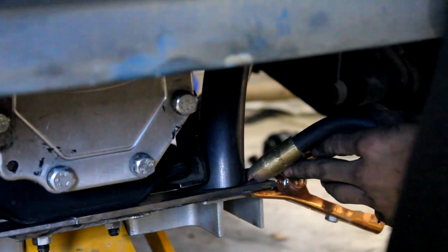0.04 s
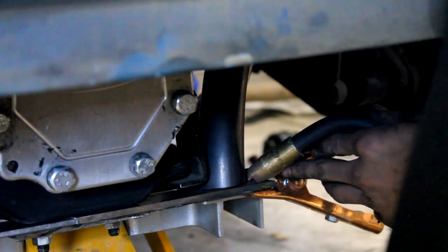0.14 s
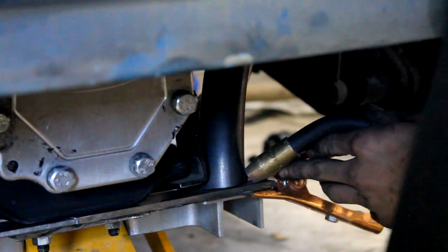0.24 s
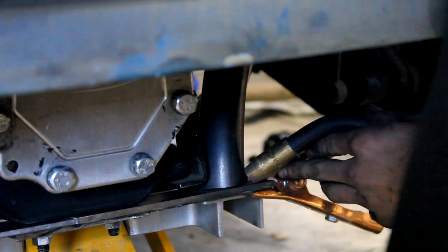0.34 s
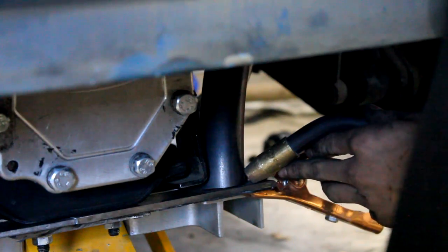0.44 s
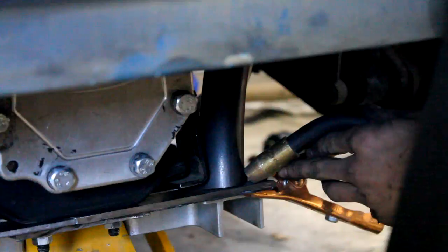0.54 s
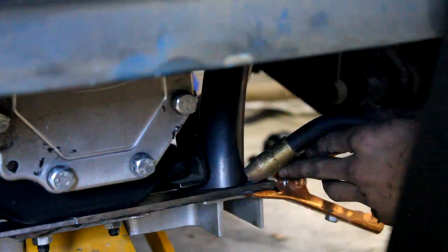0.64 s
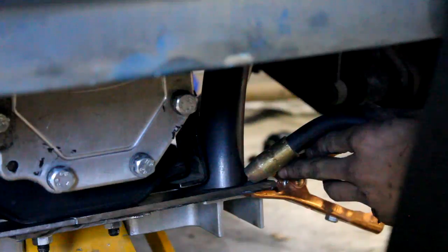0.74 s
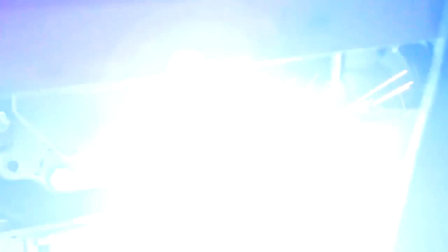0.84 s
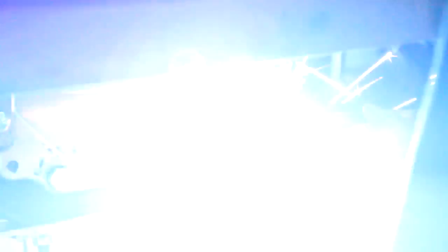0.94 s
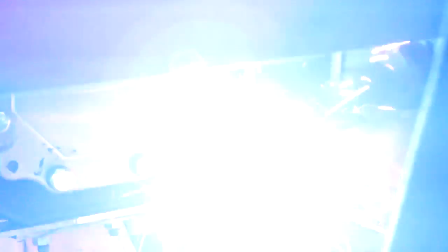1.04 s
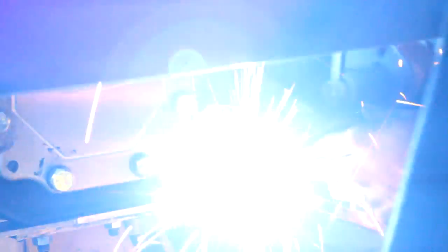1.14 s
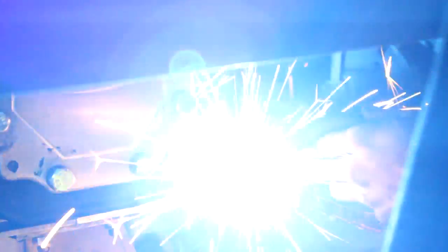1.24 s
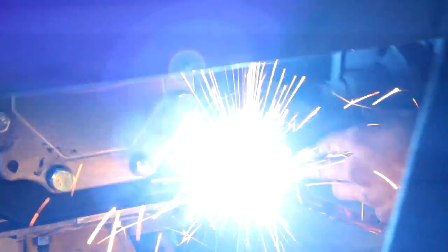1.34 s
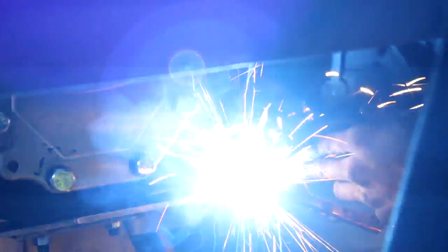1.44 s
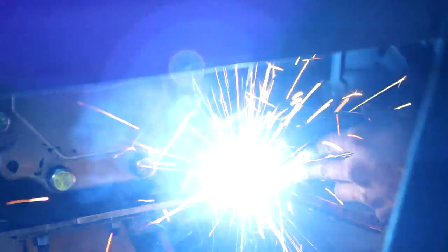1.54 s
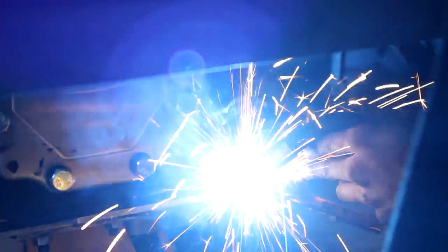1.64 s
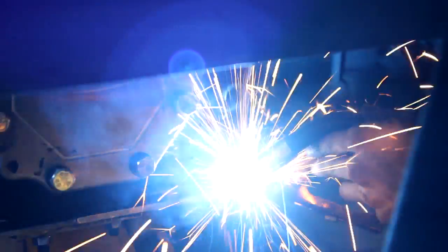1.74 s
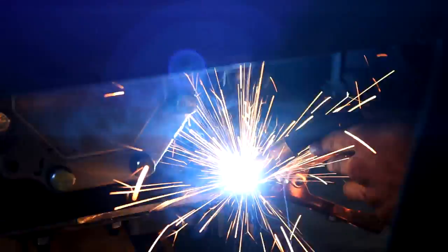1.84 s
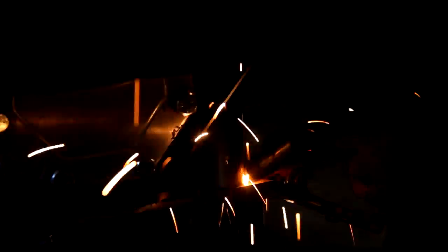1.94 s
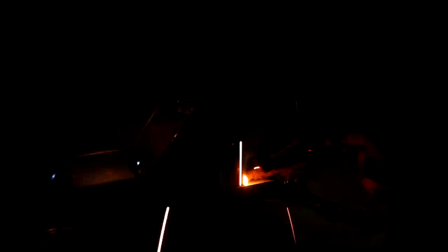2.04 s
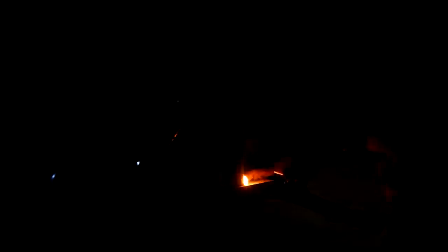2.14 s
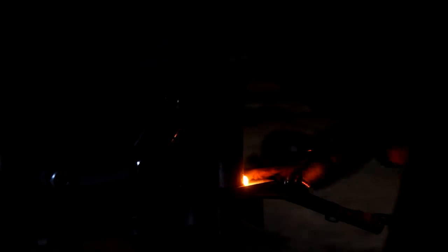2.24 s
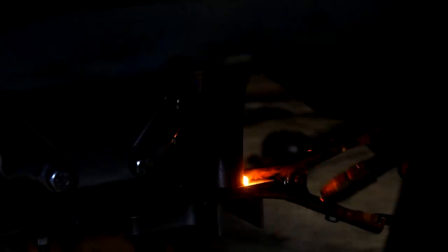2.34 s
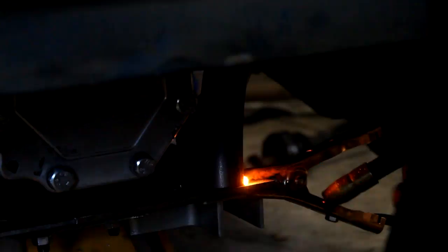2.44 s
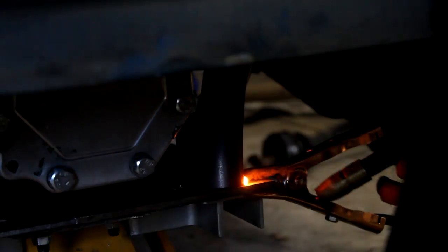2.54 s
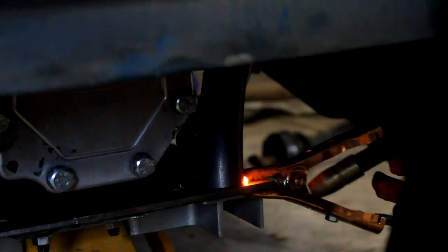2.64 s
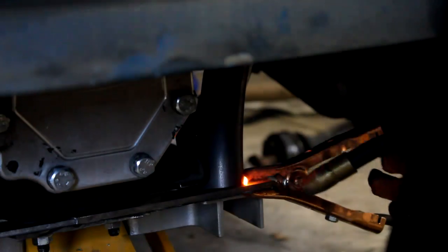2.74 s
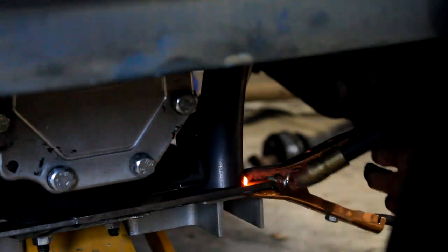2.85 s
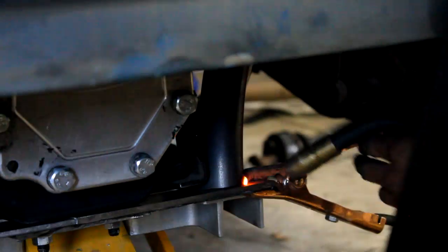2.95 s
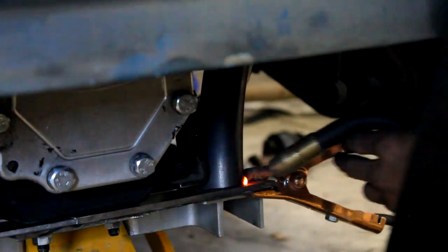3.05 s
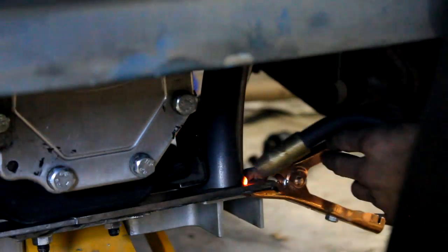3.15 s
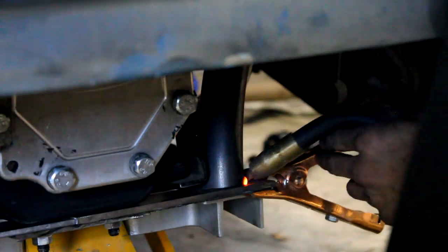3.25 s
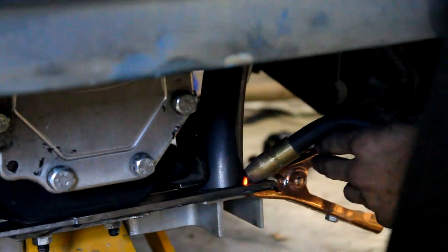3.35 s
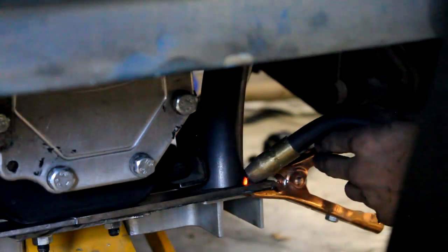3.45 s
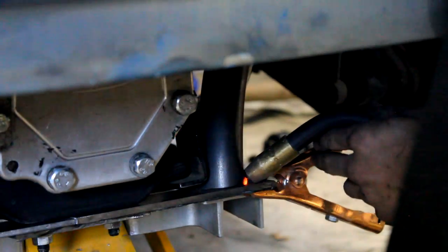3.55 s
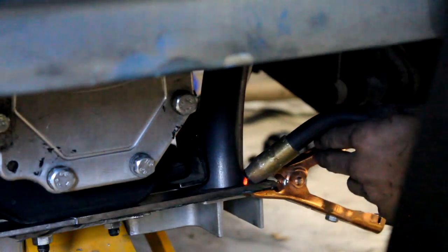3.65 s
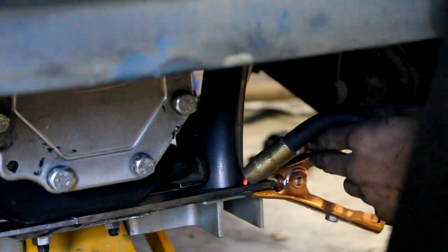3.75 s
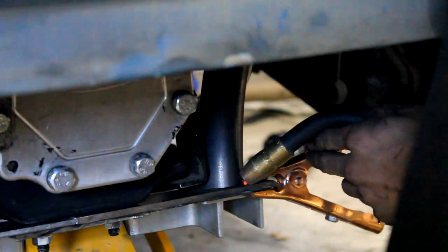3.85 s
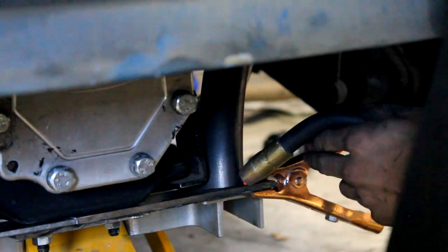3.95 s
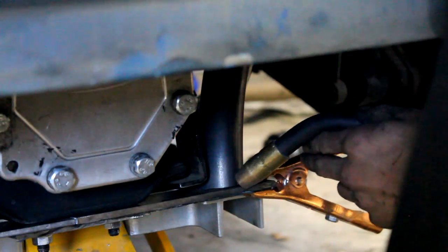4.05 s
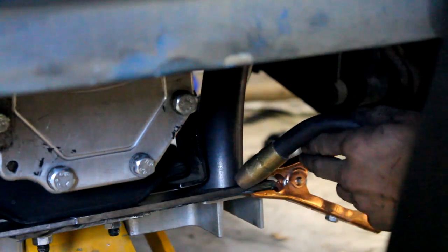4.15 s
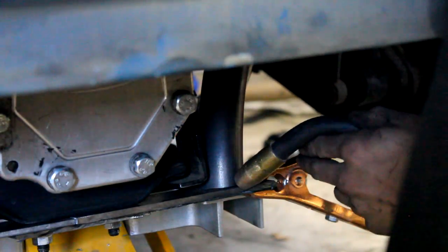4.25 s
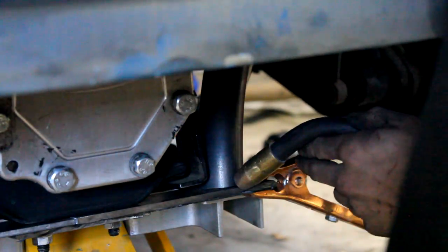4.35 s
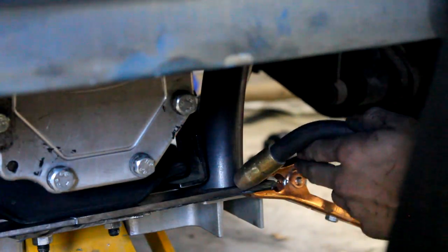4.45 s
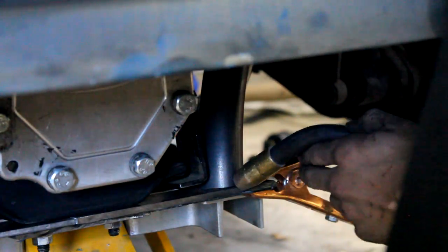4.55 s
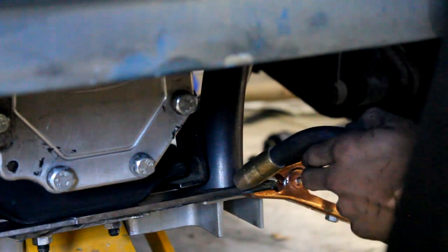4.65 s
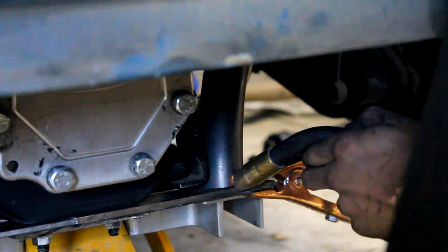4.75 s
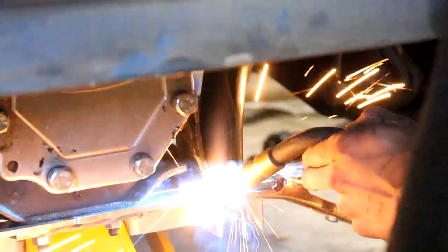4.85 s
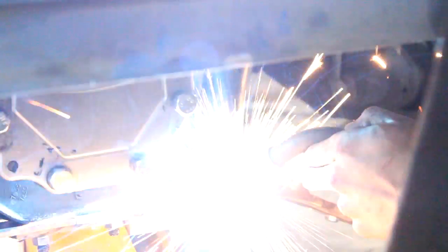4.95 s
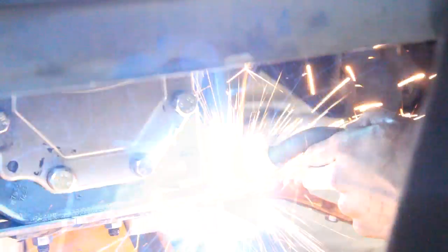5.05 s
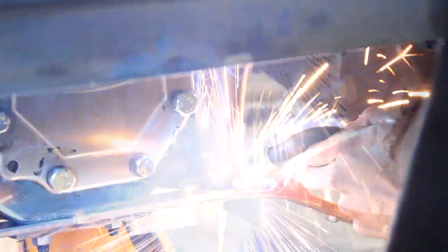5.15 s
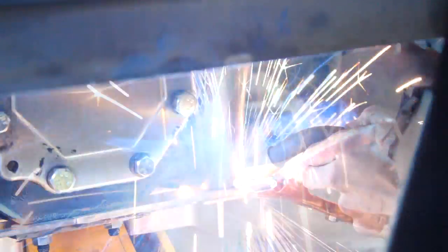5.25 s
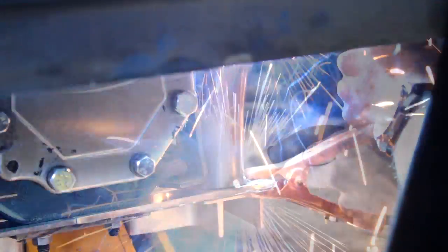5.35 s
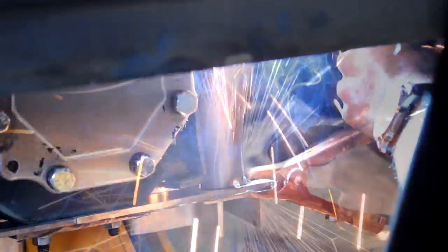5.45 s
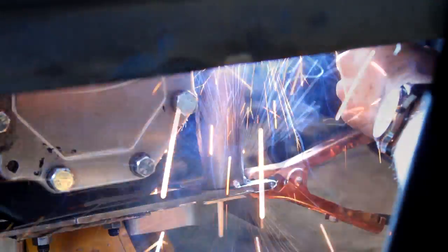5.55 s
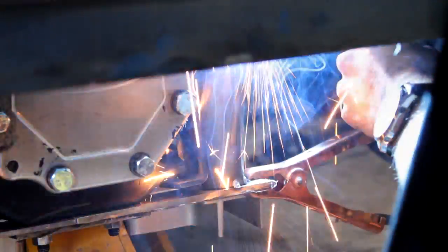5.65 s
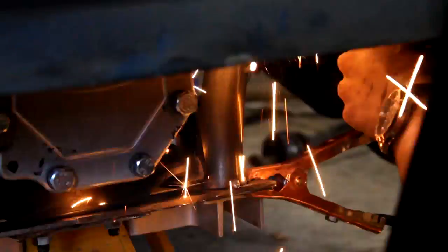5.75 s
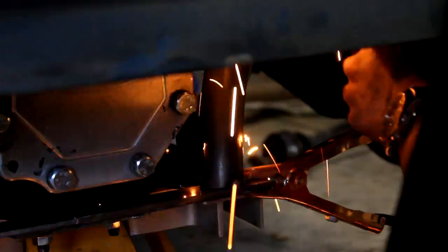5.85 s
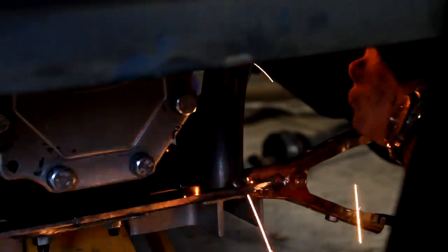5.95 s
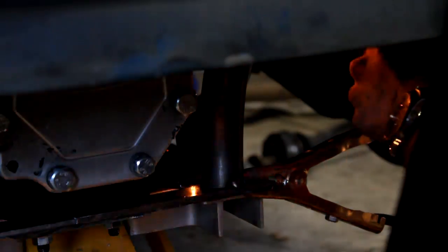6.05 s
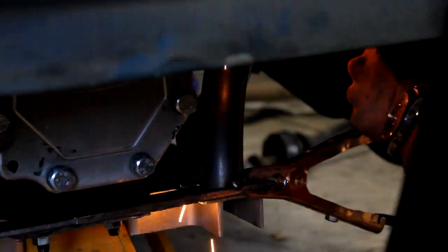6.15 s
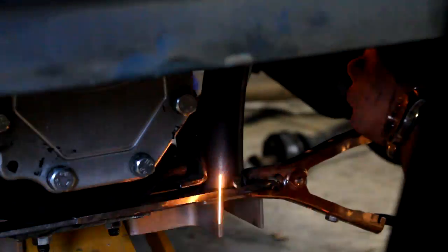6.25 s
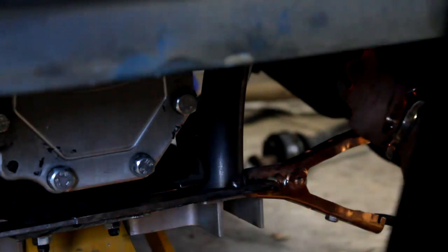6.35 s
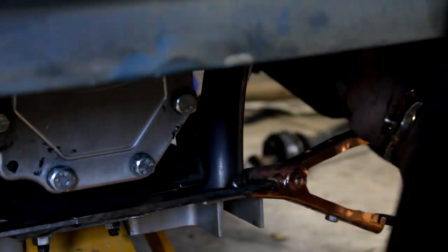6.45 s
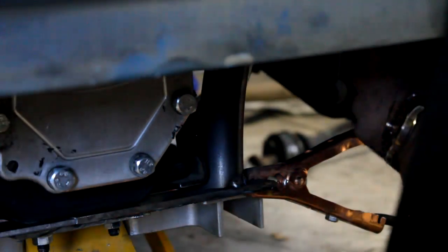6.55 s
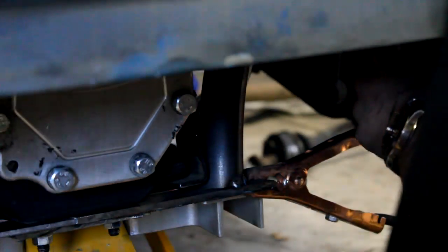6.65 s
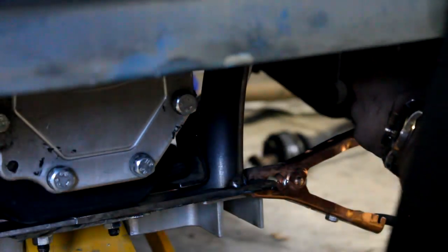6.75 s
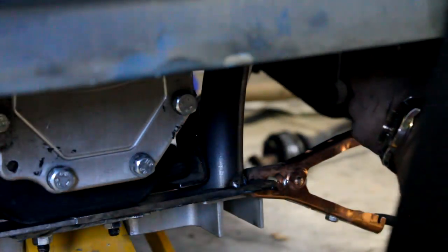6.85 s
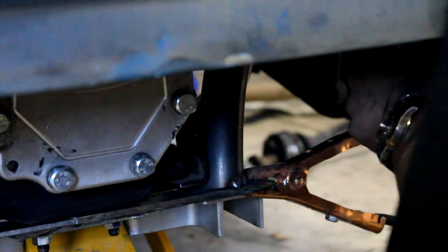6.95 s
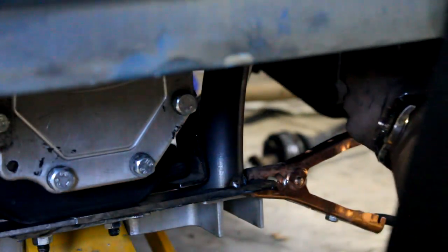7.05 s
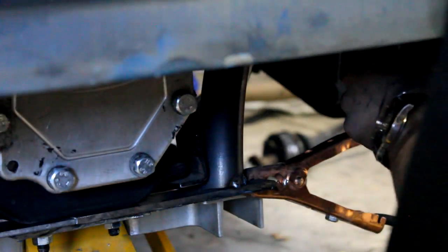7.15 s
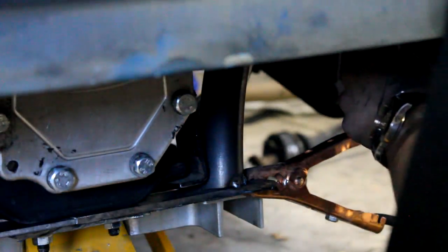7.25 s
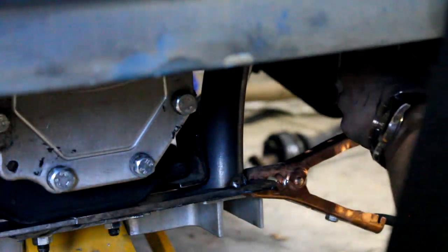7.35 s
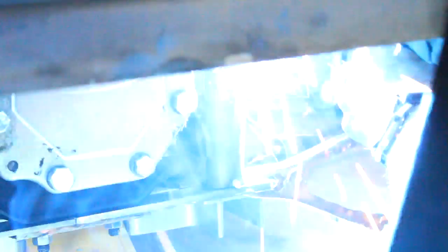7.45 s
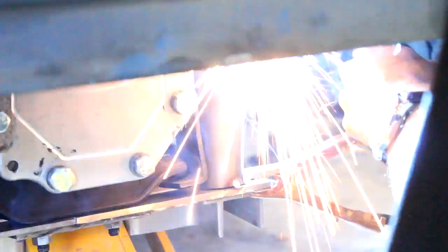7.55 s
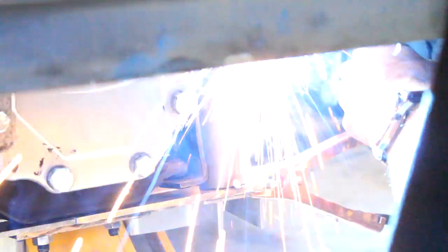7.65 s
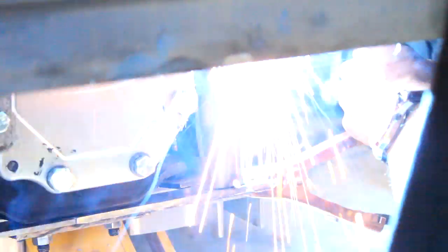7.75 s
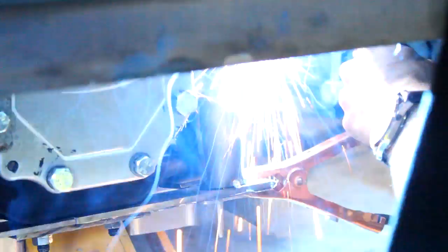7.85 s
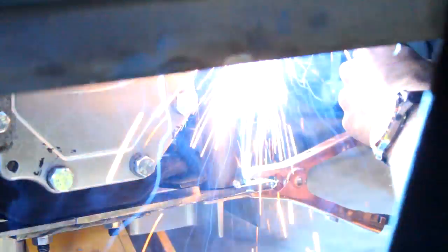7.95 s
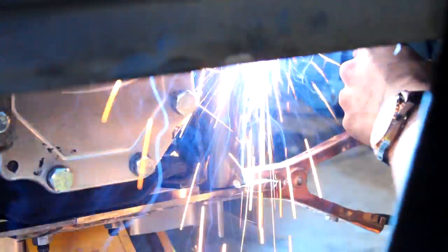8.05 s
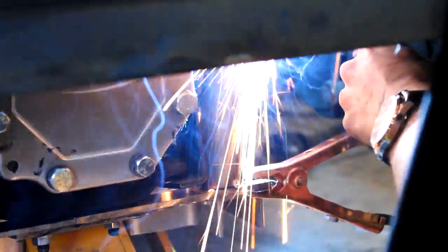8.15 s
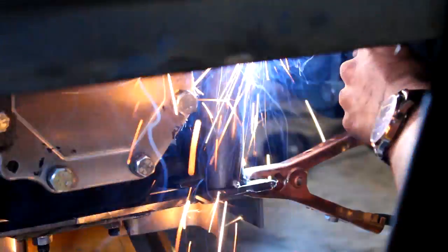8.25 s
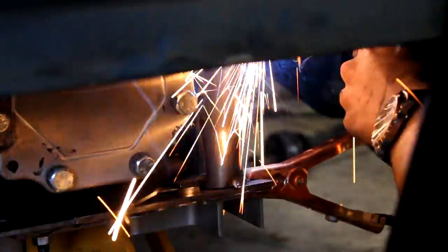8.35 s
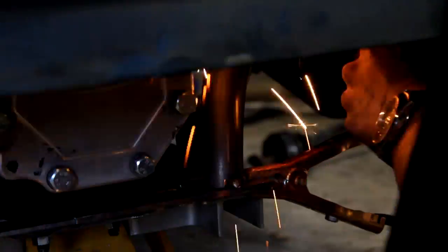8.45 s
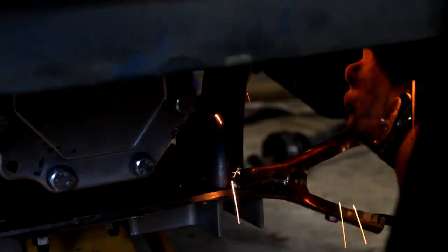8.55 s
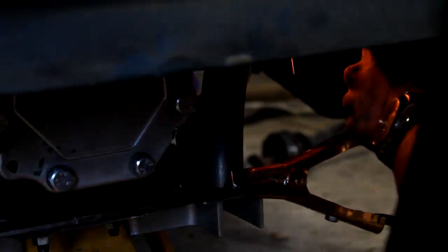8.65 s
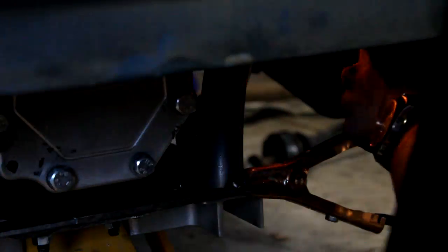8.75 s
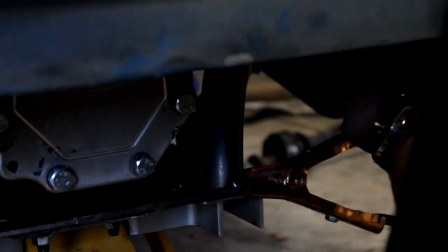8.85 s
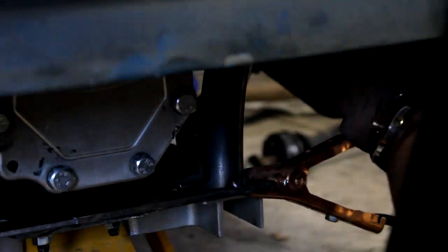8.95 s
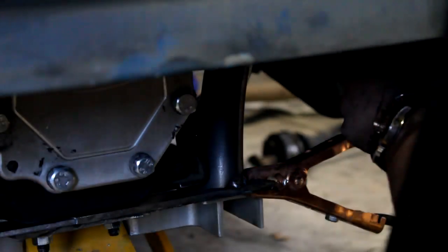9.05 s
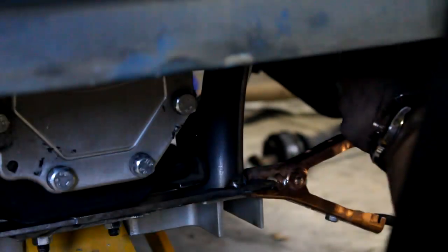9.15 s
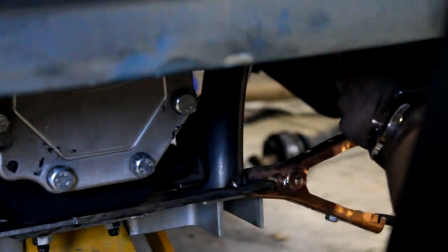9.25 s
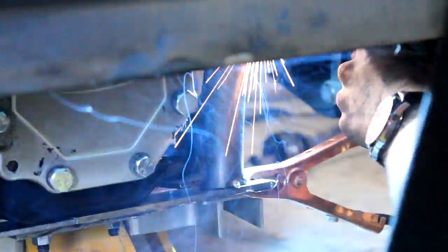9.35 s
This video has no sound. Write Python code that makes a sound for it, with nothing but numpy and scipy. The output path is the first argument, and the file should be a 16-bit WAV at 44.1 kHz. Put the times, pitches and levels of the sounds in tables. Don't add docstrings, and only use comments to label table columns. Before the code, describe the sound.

In a garage, close to the microphone, a welding machine's fan hums steadily with a faint rattling panel. A switch clicks, gas hisses, and an arc erupts in very loud, irregular pops that settle into a harsh buzz for a second. After a ringing tail and a tiny ping from cooling metal, a second tack begins with a thumping burst, then a third follows, all overloading at their peaks.

```python
import sys
import numpy as np
from scipy import signal
from scipy.fft import rfft, irfft
from scipy.io import wavfile
from scipy.ndimage import uniform_filter1d

SR = 44100
rng = np.random.default_rng(int(sys.argv[2]) if len(sys.argv) > 2 else 0)


def gain_from_decibels(decibels):
    exponent = np.asarray(decibels, float) / 20
    return 10 ** exponent


def master(y):
    cut = np.clip(np.atleast_2d(y).T, -1, 1)
    pcm = np.round(cut * 32767)
    wavfile.write(sys.argv[1], SR, pcm.astype(np.int16))


N = 414540


def level(x, db):
    return x * gain_from_decibels(db) / np.sqrt(np.mean(x ** 2))


def on_log_hz(table, size):
    hz, value = np.transpose(table)
    bin_hz = np.arange(size // 2 + 1) * SR / size
    return np.interp(np.log(np.maximum(bin_hz, 1)), np.log(hz), value)


def bumps(table):
    hz = np.arange(2049) * SR / 4096
    return sum(db / (1 + (2 * (hz - centre) / width) ** 2) for centre, width, db in table)


def colour(x, gain_db):
    cepstrum = irfft(gain_db * np.log(10) / 20)
    cepstrum[1:2048] *= 2
    cepstrum[2049:] = 0
    response = irfft(np.exp(rfft(cepstrum)))
    return signal.fftconvolve(x, response)[:len(x)]


def band(hz, width_hz, size=N):
    b, a = signal.iirpeak(hz, hz / width_hz, SR)
    return level(signal.lfilter(b, a, rng.standard_normal(size)), 0)


def fade(t60, size):
    return 1000. ** (-np.arange(size) / SR / t60)


def spikes(events):
    x = np.zeros(N)
    s, db = np.transpose(events)
    np.add.at(x, np.minimum((s * SR).astype(int), N - 1), gain_from_decibels(db))
    return x


# pitch in Hz, level in dB per Hz.
FAN_AIR = [(15, -26), (25, -24.5), (136, -6.5), (227, 2.5), (349, -7), (410, -1), (614, -3.5), (741, -2),
           (997, -6.5), (1490, -8.5), (1950, -12.5), (2300, -12), (6550, -24.5), (9300, -25.5),
           (15500, -37.5)]
# time in seconds, level in dB.
FAN_LOUDNESS = [(0, -44), (.78, -43), (2.3, -45), (4.7, -44.5), (7.3, -44.5), (9.4, -45)]
# pitch in Hz, level in dB rms.
CABINET_TONES = [(53.8, -81), (91.5, -64), (220.7, -57.5), (409.1, -61.5), (662.1, -62.5), (759.0, -57),
                 (1066, -67.5), (1233, -61.5), (1502, -61.5)]


def fan():
    air = level(colour(rng.standard_normal(N), on_log_hz(FAN_AIR, 4900)), -1.5)
    tones = sum(gain_from_decibels(db + 46) * band(hz, 2.5 + hz / 100) for hz, db in CABINET_TONES)
    s, db = np.transpose(FAN_LOUDNESS)
    return gain_from_decibels(np.interp(np.arange(N) / SR, s, db)) * (air + tones)


# time in seconds, peak in dB.
HARD_KNOCKS = [(.4494, -47), (.5227, -49), (.5955, -50), (.6679, -50), (2.7158, -49), (2.9123, -49),
               (3.1114, -50), (3.2396, -52), (3.513, -49), (3.6392, -48), (3.8382, -51), (3.8946, -48),
               (4.0388, -50), (4.1131, -51), (4.2383, -50), (4.5122, -51), (6.1293, -50), (6.258, -54),
               (6.4924, -49), (6.6376, -50), (7.0582, -51), (7.11, -50), (7.1844, -57), (7.3126, -48),
               (9.0841, -49)]
# pitch in Hz, level in dB.
PANEL_TONES = [(2315, -69.5), (2584, -81), (3295, -74), (3623, -73), (4134, -72.5), (4420, -73),
               (5600, -76.5), (6433, -88), (6988, -77), (8070, -88.5), (8236, -82.5), (8995, -80.5),
               (9082, -92), (9717, -89), (10562, -93), (11084, -84)]


def rattle(size=20000):
    shaft_hz, panel_t60 = 54.9, .07
    turns = np.arange(0, N / SR, 1 / shaft_hz)
    chance = rng.standard_normal((len(turns), 2))
    nudge_s = np.abs(turns + 0.012 + 0.00098 * chance[:, 0])
    nudge_db = -56 + 3.9 * chance[:, 1]
    nudges = spikes(np.transpose([nudge_s, nudge_db])) + spikes(HARD_KNOCKS)
    t = np.arange(size) / SR
    tones = sum(gain_from_decibels(db + 71.0) * np.sin(2 * np.pi * hz * t) for hz, db in PANEL_TONES)
    ring = fade(panel_t60, size) * tones
    tick = (fade(.03, size) + .2 * fade(.3, size)) * band(10000, 9000, size=size)
    return gain_from_decibels(-6.5) * signal.fftconvolve(nudges, ring + tick)[:N]


# time in seconds, peak in dB.
SWITCH_CLICKS = [
    (0.7851, -32),
    (4.8349, -33.5),
    (7.4455, -36),
]
# pitch in Hz, width in Hz, time to die away (60 dB) in seconds.
SWITCH_RING = (7400, 770, 0.068)


def trigger():
    hz, width_hz, t60 = SWITCH_RING
    ring = fade(t60, 8000) * band(hz, width_hz, size=8000)
    snap = .8 * fade(.04, 8000) * band(11000, 7000, size=8000)
    return gain_from_decibels(-11.5) * signal.fftconvolve(spikes(SWITCH_CLICKS), ring + snap)[:N]


# start in seconds, end in seconds.
GAS_FLOW = [
    (.787, 1.92),
    (4.836, 5.8),
    (7.447, 8.42),
]


def gas():
    t = np.arange(N) / SR
    flow = sum((t > on) * (t < off) for on, off in GAS_FLOW)
    smooth_flow = uniform_filter1d(1. * flow, size=400)
    return gain_from_decibels(-53.5) * smooth_flow * band(9000, 9100)


# time in seconds, peak in dB.
FIRST_BURSTS = [(0.8779, -18), (.8903, -24), (0.9158, 3.5), (0.9457, -18), (0.9694, 2), (0.9815, 1.5),
                (.9902, 0), (1.0197, -10), (1.038, 4), (1.0427, -2), (1.1568, 3), (1.1753, -4), (1.234, 1),
                (1.2979, 2), (1.3072, 1), (1.3149, -3), (1.363, -8), (1.525, -3), (1.532, -1), (1.692, -5),
                (1.7335, -1), (1.9072, -1.5)]
# time in seconds, peak in dB.
NEAR_BURSTS = [(4.8646, 7.5), (4.8658, 0), (4.941, -1), (4.9504, -13), (4.958, 4), (4.9735, 5.5),
               (4.983, 1.5), (5.0059, 1), (5.0149, -0.5), (5.0568, 0), (5.0722, -1.5), (5.1138, 4),
               (5.1321, -0.5), (5.2266, 3), (5.281, 1), (5.3387, 0), (5.4746, -3.5), (5.516, -5)]
# time in seconds, peak in dB.
FAR_BURSTS = [(4.8646, -3), (5.3229, 3.5), (5.3561, -1.5), (5.3645, 1), (5.4423, 3), (5.4651, 4.5),
              (5.5069, -1), (5.5389, -1), (5.5486, -8), (5.5739, -2.5), (5.5924, -1.5), (5.6021, -10.5),
              (5.781, 3), (5.798, 2), (7.472, -0.5), (7.5722, 2.5), (7.5875, -4.5), (7.655, -1),
              (7.6988, 0.5), (7.7915, 1.5), (7.85, 0), (7.9354, 0.5), (7.9501, -1), (8.027, -22),
              (8.0371, 4.5), (8.095, -9), (8.1317, 0.5), (8.15, -2), (8.2639, -2), (8.3655, -5)]
# start in seconds, end in seconds, timing scatter in ms,
# share of ripples with a second pop (0-1), size scatter in dB.
BURN_STRETCHES = [
    [(1.045, 1.33, 1.3, .3, 1.4), (1.33, 1.6, .9, .06, 1.3), (1.6, 1.92, .55, 0, 1.2)],
    [(4.99, 5.2, 1.3, .25, 1.2), (5.2, 5.61, .6, .04, 1.)],
    [(5.61, 5.8, .35, 0, 1.3), (7.59, 7.82, 1.5, .5, 2.), (7.82, 8.11, .8, .12, 1.2),
     (8.11, 8.42, .35, 0, .9)],
]
# time in seconds, peak of a pop in dB.
ARC_STRENGTH = [
    [(1.04, -0.5), (1.11, -2.5), (1.16, -1), (1.24, -2), (1.38, -2.5), (1.56, -3.5), (1.72, 0.5),
     (1.79, -1.5), (1.92, -3.5)],
    [(4.98, -1.5), (5.03, -3.5), (5.09, -4), (5.13, -2.5), (5.2, -2.5), (5.27, -2.5), (5.4, -6.5),
     (5.55, -4.5), (5.61, -9)],
    [(5.6, -6.5), (5.69, -2.5), (5.74, -1.5), (5.8, -4), (7.59, -7.5), (7.78, -6.5), (7.86, -3),
     (8.02, -3.5), (8.1, -6.5), (8.13, 1.5), (8.2, 0.5), (8.35, 0), (8.42, -4)],
]


def pops(place):
    ripple_hz, ripple_phase = 120, .83
    second_pop_db, clear_ms = -4, 3.5
    bursts = [FIRST_BURSTS, NEAR_BURSTS, FAR_BURSTS]
    marked = np.concatenate(bursts)[:, 0]
    rows = [bursts[place]]
    for start, end, scatter_ms, twice, scatter_db in BURN_STRETCHES[place]:
        count = np.arange(np.ceil(start * ripple_hz - ripple_phase), end * ripple_hz - ripple_phase)
        ripple = (count + ripple_phase) / ripple_hz
        early, size, size_again = rng.standard_normal((len(ripple), 3)).T
        again = rng.random(len(ripple)) < twice
        s = ripple + early * scatter_ms / 1000
        s = np.append(s, s[again] + .5 / ripple_hz)
        vary_db = np.append(scatter_db * size, second_pop_db + scatter_db * size_again[again])
        db = np.interp(s, *np.transpose(ARC_STRENGTH[place])) + vary_db
        free = np.abs(s[:, None] - marked).min(axis=1) > clear_ms / 1000
        rows.append(np.transpose([s, db])[free])
    return np.concatenate(rows)


# pitch in Hz, time to die away (60 dB) in seconds.
GARAGE_DECAY = [(300, 0.22), (800, 0.51), (2000, 0.63), (5500, 0.44), (10000, 0.3), (15000, 0.24)]


def garage(size=30000):
    _, _, bands = signal.stft(rng.standard_normal(size), nperseg=128)
    s = np.arange(bands.shape[1]) * 64 / SR
    decay = 1000. ** (-s / on_log_hz(GARAGE_DECAY, 128)[:, None])
    tail = signal.istft(bands * decay, nperseg=128)[1][:size]
    return tail * (1 - fade(0.02, size))


# nearby steel in dB, its time to die away (60 dB) in seconds,
# its dullness (0-1), garage in dB.
STEEL_AND_GARAGE = [
    (-19.5, .04, .4, -30.5),
    (-25, .04, .35, -30.5),
    (-14, .014, .2, -32),
]
# delay in ms, level in dB.
SINGLE_ECHOES = [
    [(.35, -5), (1.1, -5), (2.1, -4), (4.0, -13), (5.5, -12)],
    [(.8, -9), (2.1, -5), (3.9, -14), (5.8, -12)],
    [(1.4, -1), (1.8, -2), (3.3, -2), (3.8, -2)],
]
# pitch in Hz, dB per Hz.
PLACE_COLOUR = [
    [(35, -49.5), (60, -31.5), (262, -13), (492, -18), (651, -7.5), (749, -10), (1340, -11), (1510, -6),
     (3580, -11), (6740, 2), (7750, -1), (10500, 4), (12400, -0.5), (14600, 5.5), (16000, -2.5)],
    [(35, -51.5), (60, -33), (408, -13), (469, -22.5), (527, -10), (1340, -16), (1510, -3.5), (2000, -13),
     (3760, -5.5), (6280, 0), (7750, -11.5), (10500, 8.5), (12700, 8), (14600, 6.5), (16000, 7.5)],
    [(35, -66.5), (60, -71.5), (244, -18), (323, -24), (698, -15.5), (1090, -18.5), (1520, -5.5),
     (1740, -15), (2140, -15), (3340, -19), (5860, -3), (6280, 4), (7940, -8), (10300, -3), (16000, -2)],
]
# pitch in Hz, width in Hz, gain in dB.
PEAKS_AND_DIPS = [
    [(1020, 260, 4), (1520, 110, 4), (2427, 160, 7), (5790, 98.6, 3.5), (6920, 160, 6.5), (7500, 350, -8),
     (8900, 170, -3), (10720, 100, 4), (12770, 600, -12)],
    [(1500, 150, 0.5), (1950, 310, 1), (2500, 150, 5.5), (4200, 100, 7), (4750, 400, -2.5),
     (6290, 140, 8.5), (6550, 100, -3.5), (6760, 114, 11.5), (10130, 200, 2.5), (12480, 700, -6.5)],
    [(1520, 200, 3), (1800, 190, -2.5), (2133, 90, 12), (3594, 110, 12), (4540, 280, 12), (5100, 190, -4),
     (5700, 140, 2.5), (5900, 110, -16.5), (6090, 160, 5.5), (6800, 150, -11), (6730, 110, 8.5),
     (8240, 500, -2.5), (10100, 260, 8.5), (13700, 500, -11)],
]


def surroundings(place):
    steel_db, steel_t60, dull, _ = STEEL_AND_GARAGE[place]
    scatter = signal.lfilter([1], [1, -dull], rng.standard_normal(8192))
    path = gain_from_decibels(steel_db) * fade(steel_t60, 8192) * scatter
    path[0] = 1
    for ms, echo_db in SINGLE_ECHOES[place]:
        path[int(ms * SR / 1000)] += gain_from_decibels(echo_db) * rng.choice([-1, 1])
    want_db = on_log_hz(PLACE_COLOUR[place], 4096) + bumps(PEAKS_AND_DIPS[place])
    power = np.abs(rfft(path)) ** 2
    smooth = uniform_filter1d(uniform_filter1d(power, size=24), size=24)[::2]
    return colour(path, want_db - 10 * np.log10(smooth))


# pitch in Hz, level in dB per Hz.
TAIL_COLOUR = [(120, -56), (290, -20.5), (500, -20), (727, -15.5), (1070, -16), (1510, -10.5),
               (1750, -13.5), (2400, -15), (4150, -10.5), (6670, -2.5), (7820, -8.5), (10600, 2.5),
               (12800, -6), (15600, -9.5)]
# pitch in Hz, width in Hz, gain in dB.
MICROPHONE_DIPS = [(7860, 400, -7), (13100, 520, -8.5)]
PLACE_LOUDNESS = (14.5, 15.5, 18.5)


def arc(place, room):
    kicks = spikes(pops(place))
    spit_noise = signal.lfilter([0, 1], [1, -.6], kicks) * rng.standard_normal(N)
    spit = .2 * np.diff(spit_noise, prepend=0)
    garage_db = STEEL_AND_GARAGE[place][3]
    path = gain_from_decibels(garage_db) * colour(room, on_log_hz(TAIL_COLOUR, 4096))
    path[:8192] += surroundings(place)
    path = colour(path, bumps(MICROPHONE_DIPS))
    path = signal.lfilter(*signal.butter(2, 140, "high", fs=SR), path)
    return gain_from_decibels(PLACE_LOUDNESS[place] + 0.32) * signal.fftconvolve(kicks + spit, path)[:N]


# pitch in Hz, level in dB, time to die away (60 dB) in seconds.
COOLING_TONES = [(5600, -56, .16), (7450, -53, .05), (10000, -62, .04), (14000, -68, .15)]


def ping():
    t = np.arange(N) / SR - 3.424
    x = np.zeros(N)
    for hz, db, t60 in COOLING_TONES:
        x += gain_from_decibels(db) * (t > 0) * 1000. ** (-np.abs(t) / t60) * np.sin(2 * np.pi * hz * t)
    return x


# time in seconds, level in dB, decay in
# seconds.
LOW_THUMP = (4.8646, -6, 0.0023)


def thump():
    s, db, decay = LOW_THUMP
    t = np.maximum(np.arange(N) / SR - s, 0)
    return -gain_from_decibels(db) * (1 - np.exp(-t / 0.00036)) * np.exp(-t / decay)


def scene():
    room = garage()
    tacks = sum(arc(place, room) for place in range(3))
    return (fan() + rattle() + trigger() + gas() + tacks + ping())[None]


def roll_off(x):
    return signal.sosfilt(signal.butter(12, 16520, fs=SR, output="sos"), x)


def record(dry):
    clip = 1.08
    hot = np.clip(np.clip(dry, -clip, clip) + thump(), -clip, clip)
    treble_cut = signal.ellip(8, .1, 25, 15740, fs=SR, output="sos")
    mix = signal.sosfiltfilt(treble_cut, hot)
    return roll_off(mix)


dry = scene()
out = record(dry)
master(out)
```